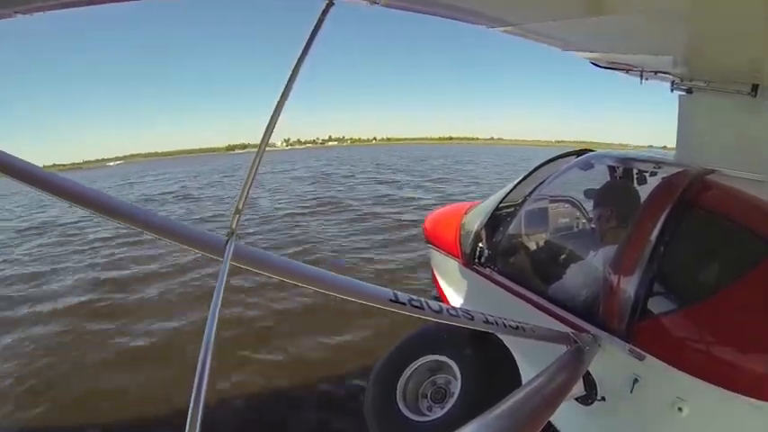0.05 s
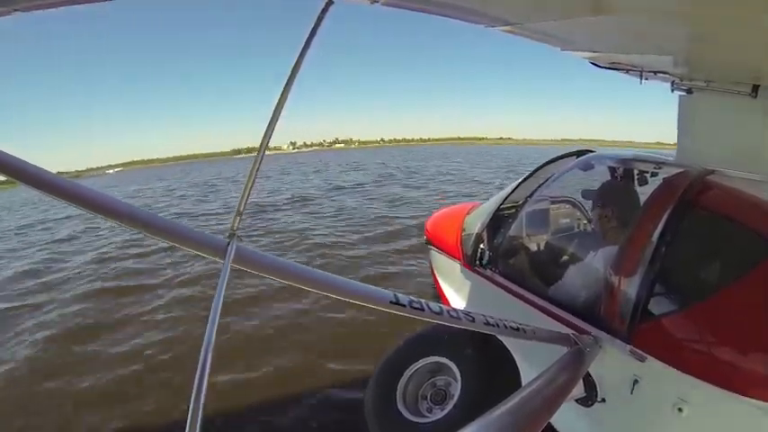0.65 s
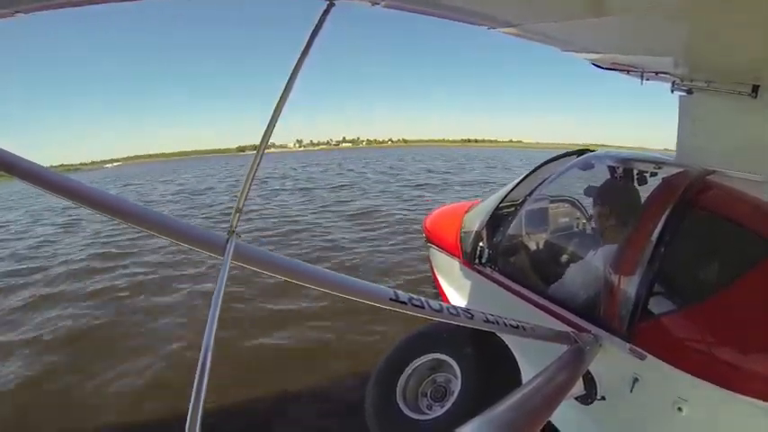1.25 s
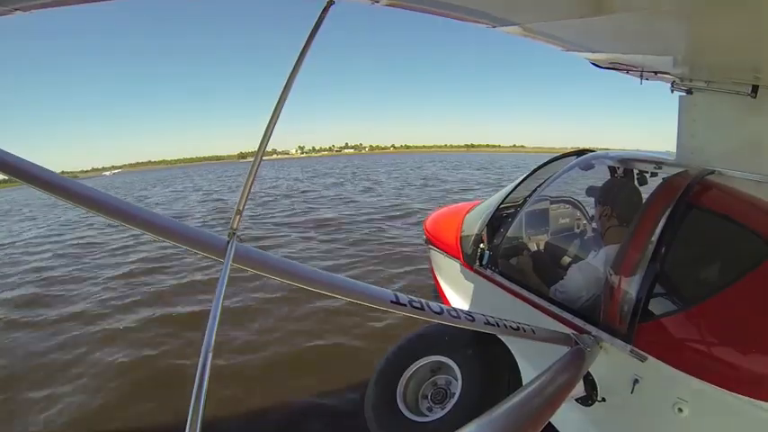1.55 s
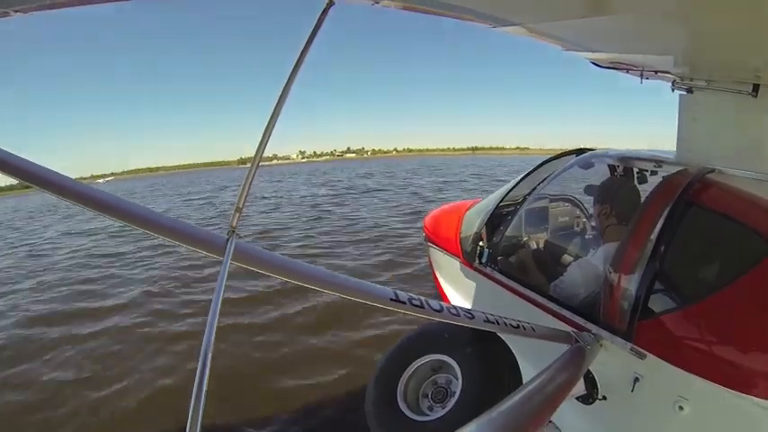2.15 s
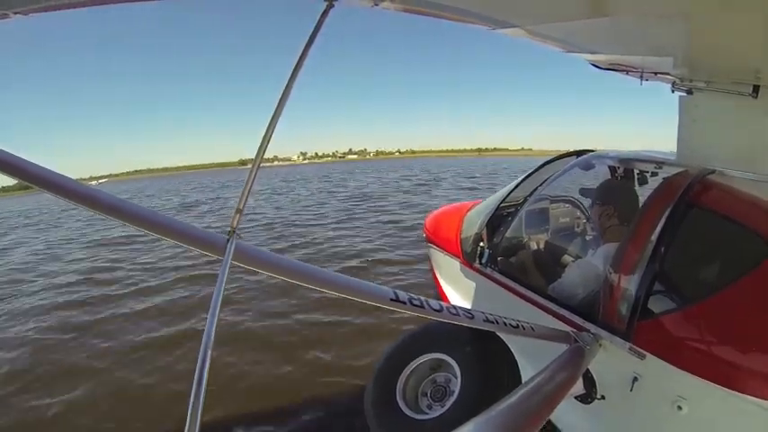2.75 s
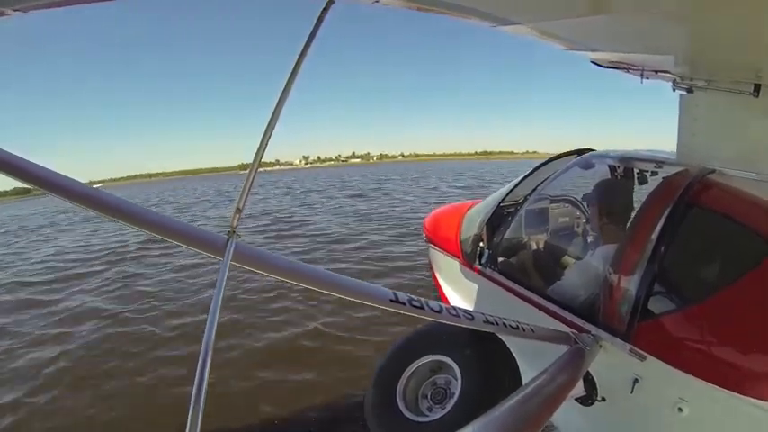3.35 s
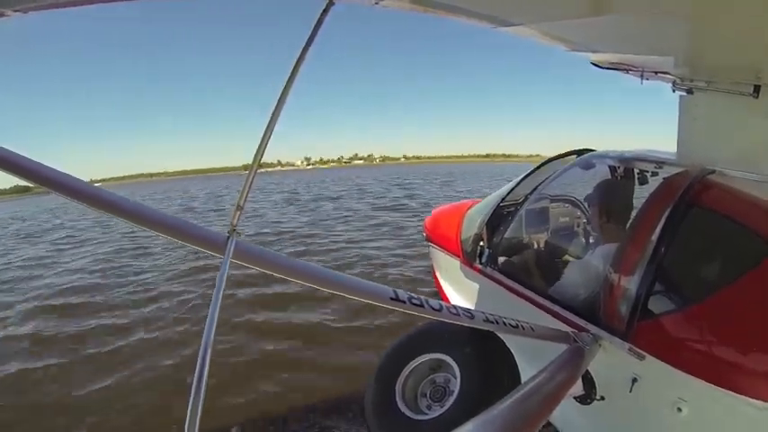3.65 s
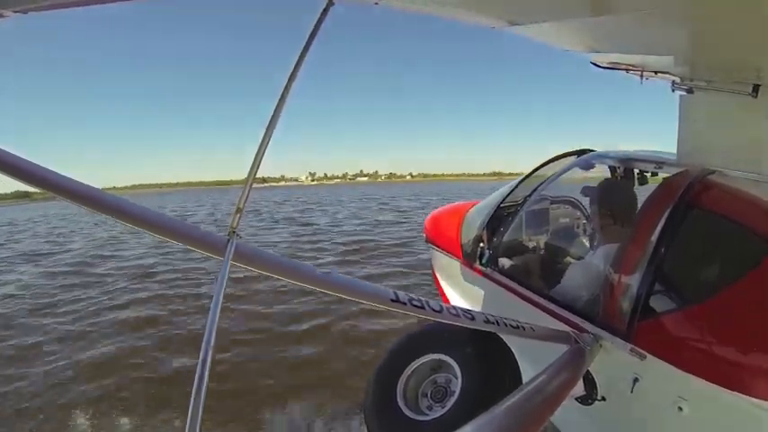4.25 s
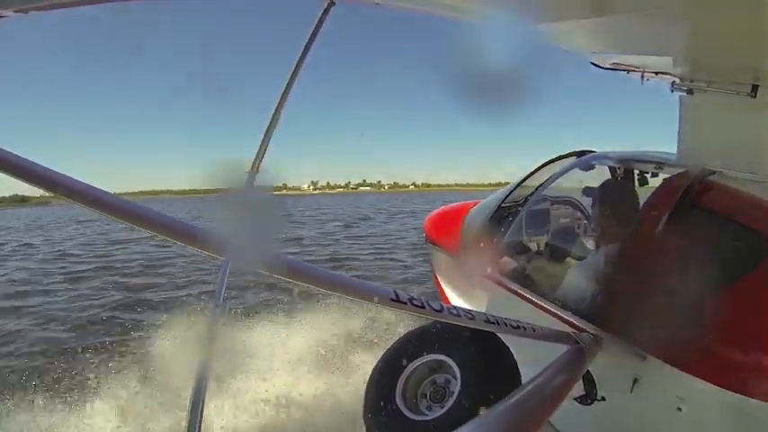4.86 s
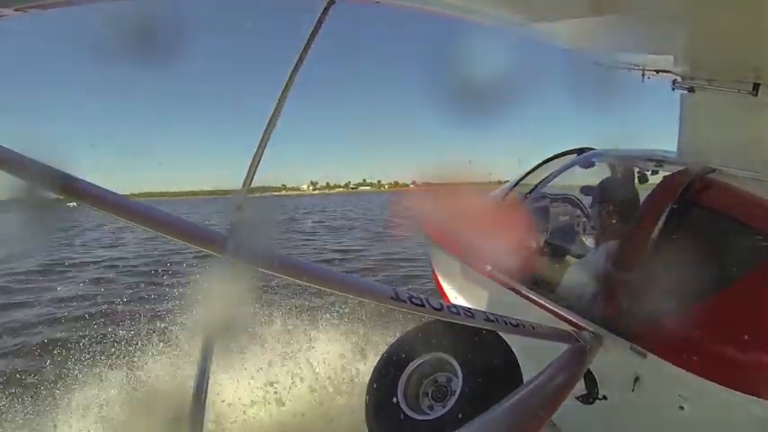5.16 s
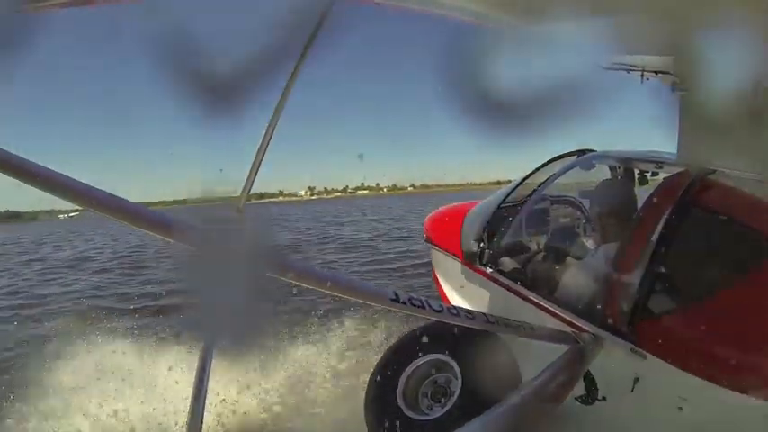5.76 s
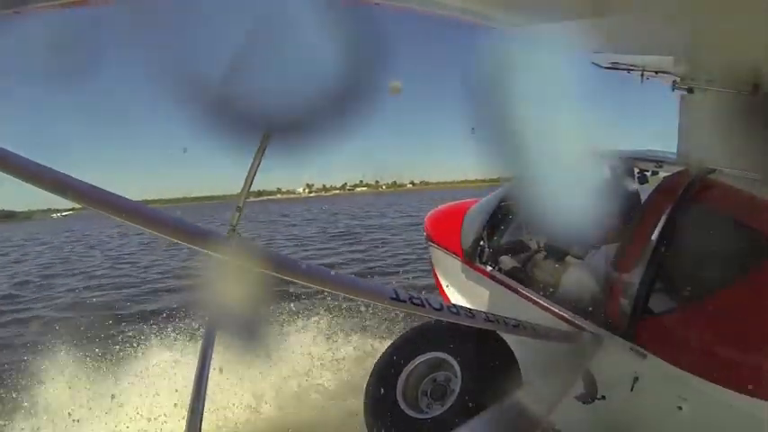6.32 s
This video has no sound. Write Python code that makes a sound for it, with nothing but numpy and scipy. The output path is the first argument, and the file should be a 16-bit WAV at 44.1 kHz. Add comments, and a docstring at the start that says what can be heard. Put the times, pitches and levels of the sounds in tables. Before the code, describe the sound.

Close on the wing of a light plane descending over water, rough wind rumbles and hisses in surges over the low pulse of an idling engine. A few knocks, hollow thumps and small rattles come from the vibrating structure. Then the hull meets the river, and splashes slap the microphone housing, followed by thickening spray, ticking drops and one hard final hit while the engine and wind carry on.

```python
"""A low engine throb and a rush of air are heard first, from a cased camera on the wing of a small
amphibian plane that glides, idling, down to a river. Turbulent surges force the wing and the case
into resonance; gusts thump the panels, and the mount rattles and knocks now and then.
At touchdown slugs of water strike the case and excite its modes, then spray and single drops
patter over it."""
import sys
import numpy as np
from scipy import signal
from scipy.fft import rfft, irfft, next_fast_len
from scipy.io import wavfile
from scipy.ndimage import uniform_filter1d, minimum_filter1d

SR = 44100
rng = np.random.default_rng(int(sys.argv[2]) if len(sys.argv) > 2 else 0)


def to_wav(sig):
    """Store sig (one row per channel, or 1-D mono) as 16-bit WAV at the path in sys.argv[1].

    Samples outside -1..1 are clipped; the rate is SR.
    """
    pcm = np.clip(np.atleast_2d(sig), -1, 1) * 32767
    pcm = np.round(pcm).astype(np.int16)
    wavfile.write(sys.argv[1], SR, pcm.T)  # frames by channels


N = 281799
TIME = np.arange(N) / SR

# Levels are relative within each table.
# rotation rate of the crankshaft: (t/s, f/Hz)
CRANK_RATE = [(0, 34.81), (.9, 33.86), (1.5, 32.13), (2.1, 32.2), (3, 31.17), (4, 30.93), (5, 30.62),
              (6.39, 30.38)]
# engine partials: (multiple of the crankshaft rate, level/dB)
ENGINE_ORDERS = [(1, -17.5), (1.5, -33.5), (2, -28), (2.5, -36.5), (3, -31.5), (3.5, -51), (5, -28.5),
                 (5.5, -33.5), (6.5, -39), (8, -44.5), (18, -60.5), (21, -61.5)]
# sway of the wing, growing through the glide and fading on the water: (t/s, level/dB)
SWAY_LEVEL = [(0, -13.5), (.6, -15.5), (1.2, -13.5), (1.45, -9.5), (2.0, -12.5), (3.7, -9), (4.7, -14),
              (5.5, -15), (5.75, -11.5), (6.39, -15.5)]
# the sway falters as the hull settles: (t/s, duration/s, change/dB)
SETTLING_DIPS = [(4.74, .09, -11), (5.42, 0.1, -9)]
# modes of the wing frame: (f/Hz, bandwidth/Hz, level/dB)
FRAME_MODES = [(44, 20, -13), (66, 6.7, -0.5), (78, 10, -5), (93.2, 14, -2.5)]
# modes of the wing panels: (f/Hz, bandwidth/Hz, level/dB)
PANEL_MODES = [(156.4, 9.6, 1.5), (175.2, 22.8, -1.5), (189.7, 14, -2), (204.2, 8.8, -2),
               (246.1, 11.6, -12.5), (287, 15.7, -18)]
# broadband rumble of the wing: (f/Hz, level/dB)
RUMBLE_SPECTRUM = [(20, -27), (40, 7), (110, -10), (135, 4), (200, -15), (290, -13), (340, -22.5),
                   (700, -68)]
# airflow between surges: (t/s, rush level/dB, hiss level/dB)
STEADY_AIRFLOW = [(0, -38, -56.5), (.6, -41.5, -59.5), (1.8, -39, -55), (2.6, -39, -54), (3.25, -38, -52.5),
                  (4.4, -38, -52), (5.3, -39, -50), (6.39, -35, -50.5)]
# surges of turbulent air: (t/s, duration/s, slipstream rise/dB, buffeting rise/dB)
AIR_SURGES = [(.03, 0.23, 3, 4), (0.238, .27, 7.5, 12), (0.681, 0.31, 7, 6.5), (1.014, 0.048, 5.5, 10),
              (1.2, .23, 4.5, 3.5), (1.533, 0.13, 5.5, 9), (1.94, 0.52, 6.5, 7.5), (2.49, 0.31, 2, 3),
              (2.879, 0.17, 4, 4.5), (3.55, 1.08, 4, 4.5), (4.85, 0.29, 1.5, 4.5), (5.416, 0.35, 3, 1),
              (5.913, .36, 3.5, 6)]
# modes of the case and its mount: (f/Hz, bandwidth/Hz, struck level/dB, air-driven level/dB)
CASE_MODES = [(420, 317, -11, -11), (563, 76, -23, -6.5), (852.6, 65, -2, -2), (935, 53.6, 5, -2),
              (1002.4, 37.6, -3, 1), (1120.5, 29.6, 4, -2.5), (1175, 85, -20, -5), (1315, 56, 2.5, 0.5),
              (1442, 113, 4, -7), (1783, 32, 0.5, -8), (1886, 130, -3.5, -14), (2105, 41, 2, -14),
              (2540, 24, -11, -18.5), (2820, 105, -5, -21), (2920, 66, -6, -34), (3100, 140, -43, -19),
              (3350, 174, -24, -20)]
# hiss of the slipstream: (f/Hz, level/dB)
HISS_SPECTRUM = [(300, 3), (1500, 10), (2400, 15.5), (3400, 6), (4000, 7), (4800, 9), (5500, 2.5),
                 (6450, 5), (7400, -1.5), (8700, 2), (9900, -2.5), (11000, 1), (13000, -7.5), (15000, -34)]
# jolts of a loose fitting: (t/s, level/dB)
FITTING_JOLTS = [(.148, -25), (.306, -30), (.372, -28), (.825, -28.5), (1.126, -30), (2.079, -21.5),
                 (2.299, -29), (2.350, -28.5), (2.4, -28.5), (2.903, -29), (2.960, -26), (3.04, -29.5),
                 (3.096, -31), (3.372, -29), (3.624, -27), (3.889, -21), (4.004, -26.5), (4.135, -25.5),
                 (4.233, -26.5), (4.919, -24)]
# modes of that fitting: (f/Hz, bandwidth/Hz, level/dB)
FITTING_MODES = [(1870, 105, -1), (2055, 63, 3), (2868, 110, -0.5), (3430, 180, -11.5)]
# blows from the mount in flight, then from water: (t/s, level/dB, tilt/(dB per octave), decay time/s)
CASE_BLOWS = [(.4100, -17, -1.5, .002), (0.4926, -11.5, 2.5, 0.003), (0.7072, -23.5, -9, 0.0013),
              (1.066, -33.5, 18, .001), (1.2962, -14.5, -5.5, 0.0046), (4.5541, -7.5, -1.5, 0.003),
              (4.6789, -13, -2.5, 0.0078), (4.7434, -7.5, -0.5, 0.0038), (4.817, -21.5, -1.5, 0.0049),
              (4.848, -9.5, -4, 0.018), (5.058, -7, -2, 0.0022), (5.069, -9, -5.5, 0.0037),
              (5.1743, -17, -7.5, 0.004), (5.559, -23, 1, .003), (5.6742, -18.5, -4, 0.0014),
              (5.8173, -20, -4, 0.005), (6.0538, -21, 1, 0.0014), (6.2020, -14.5, -7, 0.0025),
              (6.2530, 2.5, 0.5, 0.0039), (6.2585, -2.5, -8, 0.008)]
# crack of a blow: (f/Hz, level/dB)
CRACK_SPECTRUM = [(250, -4.5), (400, -4.5), (700, -15), (1300, 8), (2400, -5.5), (3100, 1), (4200, -16),
                  (5200, -22), (7400, -25.5), (8500, -58), (15000, -51)]
# gusts that slap the panels: (t/s, peak level/dB)
GUST_SLAPS = [(.446, -5.5), (.464, -6), (.855, -11), (0.899, -10.5), (1.057, -14.5), (2.064, -14.5),
              (2.98, -10), (4.219, -11), (4.685, -14), (5.655, -16), (6.0, -17)]
# panel modes excited by a gust: (f/Hz, bandwidth/Hz, level/dB)
THUMP_MODES = [(184.4, 29.4, 3), (209, 29.3, -0.5), (285, 23, -16)]
# patter of spray on the case: (f/Hz, level/dB)
PATTER_SPECTRUM = [(250, -16), (700, -1), (1000, 5.5), (1400, 9.5), (2100, 3), (2400, -7.5), (3000, -2.5),
                   (4500, -19), (6500, -39), (8000, -37), (11000, -37), (15000, -68)]
# crackle of the finest droplets: (f/Hz, level/dB)
CRACKLE_SPECTRUM = [(2000, -14), (4400, 10), (5500, -3), (6500, 3), (7600, -9), (11000, -6), (15000, -13)]
# sheets of spray sweeping the case: (t/s, duration/s, rise/dB)
SPRAY_SHEETS = [(5.41, 0.083, 8.5), (5.535, 0.053, 8), (5.64, 0.06, 5), (6.01, .21, 3.5)]
# single drops on the case: (t/s, level/dB, f/Hz)
DROP_IMPACTS = [(4.5257, -32, 6440), (4.527, -34, 4700), (4.7018, -37, 6360), (4.8537, -37, 6500),
                (4.9817, -40, 6500), (5.0181, -38, 6500), (5.3119, -38, 6496), (5.432, -30.5, 4520),
                (5.493, -34.5, 8700), (5.557, -28, 4170), (5.7033, -36, 6500), (6.0323, -37, 6486)]


def undb(db):
    """Amplitude ratio of a level in decibels."""
    return 10 ** (np.asarray(db) / 20)


def unit(x):
    """Normalisation to rms 1."""
    return x / np.sqrt(np.mean(x ** 2))


def curves(table):
    """Linear interpolation of each column in time."""
    s, *columns = np.transpose(table)
    return [np.interp(TIME, s, c) for c in columns]


def swells(rows, attack_s, release_s):
    """Sum of trapezoidal envelopes in dB, from rows of (t/s, duration/s, change/dB)."""
    return sum(db * np.clip((TIME - s) / attack_s, 0, 1)
               * np.clip(1 - (TIME - s - length_s) / release_s, 0, 1) for s, length_s, db in rows)


def noise(n=N):
    """Gaussian white noise."""
    return rng.standard_normal(n)


def walk(rate):
    """Random modulation of rms 1: ramps between values drawn rate times a second."""
    k = max(int(SR / rate), 1)
    return unit(uniform_filter1d(np.repeat(noise(N // k + 1), k), k)[:N])


def grains(rate, spread_db):
    """Shot noise: rate random impacts a second, mostly small and a few large."""
    hit = rng.random(N) < rate / SR
    size = undb(spread_db * np.minimum(rng.exponential(size=N), 4))
    return unit(hit * size * np.sign(noise()))


def ring(x, modes):
    """Modal superposition; neighbouring modes move in antiphase."""
    return sum((-1) ** k * undb(db) * signal.lfilter(*signal.iirpeak(hz, hz / width, SR), x)
               for k, (hz, width, db) in enumerate(modes))


def colour(x, spectrum):
    """Minimum-phase filter through (f/Hz, level/dB) points; folding the cepstrum makes it causal."""
    hz, db = np.transpose(spectrum)
    size = next_fast_len(2 * len(x), True) // 2 * 2
    bins_hz = np.maximum(np.arange(size // 2 + 1) * SR / size, 1)
    magnitude = undb(np.interp(np.log(bins_hz), np.log(hz), db))
    cepstrum = irfft(np.log(magnitude))
    cepstrum[1:size // 2] *= 2
    cepstrum[size // 2 + 1:] = 0
    return irfft(rfft(x, size) * np.exp(rfft(cepstrum)))[:len(x)]


def lowpass(x, hz, order):
    """Maximally flat low-pass filter."""
    return signal.sosfilt(signal.butter(order, hz, fs=SR, output="sos"), x)


def steady(x, span_s):
    """Running normalisation: the rms over span_s stays near 1."""
    return x / np.sqrt(uniform_filter1d(x ** 2, int(span_s * SR)) + 1e-12)


def add_at(out, s, sound):
    """Superposition of a short sound on out, starting at s seconds."""
    start = int(s * SR)
    out[start:start + len(sound)] += sound[:N - start]


def engine(turns):
    """Periodic excitation: a four-stroke cycle spans two turns, giving whole and half orders."""
    flutter = walk(6)  # shared phase modulation, deeper in the higher orders
    out = np.zeros(N)
    for order, db in ENGINE_ORDERS:
        amplitude = np.sqrt(2) * undb(db + 2 * walk(3.954))
        phase = 2 * np.pi * (order * turns + rng.random())
        out += amplitude * np.sin(phase + 0.074 * order * flutter + 0.34 * walk(9))
    return out


def wing(turns, buffet_db, sway_hz=22.25):
    """Forced vibration: air buffets the swaying wing's frame and panels; engine strokes pulse the panels."""
    sway_db = curves(SWAY_LEVEL)[0] + swells(SETTLING_DIPS, attack_s=.07, release_s=.07) - 1.5
    flicker_db = 1.88
    frame_db = -27.5 + 0.81 * buffet_db + flicker_db * walk(13)
    panel_db = -28.5 + buffet_db + flicker_db * walk(16)
    sway = np.sin(2 * np.pi * np.cumsum(sway_hz + 1.176 * walk(3.8)) / SR)
    shudder = ring(noise(), [(30.54, 4.3, 0)])
    sway += 0.28 * unit(ring(shudder, [(31.7, 36, 0)]))
    frame = unit(lowpass(ring(noise(), FRAME_MODES), 154, order=4))
    frame += undb(-7.5) * unit(colour(noise(), RUMBLE_SPECTRUM))
    strokes = 1 + 0.61 * np.cos(2 * np.pi * 2 * turns)
    panels = lowpass(ring(noise() * strokes, PANEL_MODES), 305, order=10)
    return (steady(sway, 0.34) * undb(sway_db) + steady(frame, .1) * undb(frame_db)
            + steady(panels, .08) * undb(panel_db))


def slipstream(turns, surge_db):
    """Broadband excitation: turbulence, throbbing with the engine, rings the case under a hiss."""
    rush_db, hiss_db = curves(STEADY_AIRFLOW)
    eddies = undb(1.2 * walk(45) + .9 * walk(150))
    strokes = 1 + 0.28 * np.cos(2 * np.pi * 2 * turns)
    air = noise() * eddies * strokes + 0.46 * grains(200, spread_db=4.3)
    modes = [(hz, width, db) for hz, width, _, db in CASE_MODES]
    rush = unit(lowpass(ring(air, modes), 4430, order=3))
    ticks = .3 * grains(270, spread_db=4)
    hiss = unit(colour(noise() * eddies + ticks, HISS_SPECTRUM))
    return rush * undb(rush_db + surge_db) + hiss * undb(hiss_db + 0.86 * surge_db)


def rattles(surge_db):
    """Intermittent contact: a loose fitting buzzes at each jolt and chatters faintly, more in a surge."""
    jolts, t = np.zeros(N), TIME[:SR // 12]
    for s, db in FITTING_JOLTS:
        buzz = noise(len(t)) * np.exp(-t / .003)
        buzz[0] += 14  # first strike against the seat
        add_at(jolts, s, undb(db - 19.5) * unit(ring(buzz, FITTING_MODES)))
    chatter = unit(ring(grains(50, spread_db=2.3), FITTING_MODES))
    return lowpass(jolts + undb(-58 + 0.43 * surge_db) * chatter, 3800, order=4)


def knocks():
    """Impact excitation: a sharp push and a short splatter ring the case and thump the panel beneath."""
    out, t = np.zeros(N), TIME[:SR // 5]
    modes = [(hz, width, db) for hz, width, db, _ in CASE_MODES]
    thump = (np.sin(2 * np.pi * 210 * t) + 0.79 * np.sin(2 * np.pi * 300 * t)) * np.exp(-t / 0.032)
    for s, db, tilt_db, decay_s in CASE_BLOWS:
        fade = np.exp(-t / decay_s)
        splatter = noise(len(t)) * fade
        push = 0.88 * splatter / np.linalg.norm(splatter)
        push[0] += 1
        body = lowpass(ring(push, modes), 4000, order=4)
        crunch_fade = 0.35 * np.exp(-t / 0.0087)  # a weaker crunch trails the crack
        crack = colour(noise(len(t)) * (fade + crunch_fade), CRACK_SPECTRUM)
        blow = unit(body) + undb(-5.5) * unit(crack)
        blow = colour(blow, [(750, -tilt_db), (1500, 0), (3000, tilt_db)])
        add_at(out, s, undb(db) * (undb(-22) * unit(blow) + undb(-18) * thump))
    return out


def gusts(push_decay_s=0.0068):
    """Transient response: a sudden gust sets the panels' low modes ringing in a hollow thump."""
    out, t = np.zeros(N), TIME[:SR // 6]
    for s, db in GUST_SLAPS:
        push = noise(len(t)) * np.exp(-t / push_decay_s)
        thump = lowpass(ring(push, THUMP_MODES), 312, order=4)
        add_at(out, s, undb(db) * thump / np.abs(thump).max())
    return out


def spray(touchdown_s=4.39, attack_s=0.32, growth_db_per_s=2.4):
    """Shot noise of droplets: their impacts merge into a patter, and the finest crackle brightly."""
    wet_s = TIME - touchdown_s
    onset = np.clip(wet_s / attack_s, 0, 1)
    spray_db = -41.5 + growth_db_per_s * wet_s + swells(SPRAY_SHEETS, attack_s=0.034, release_s=.04)
    droplets = (grains(1100, spread_db=3.8) + 0.65 * noise()) * undb(2 * walk(50))
    patter = unit(colour(droplets, PATTER_SPECTRUM))
    crackle = unit(colour(grains(170, spread_db=2.9), CRACKLE_SPECTRUM))
    return (patter + undb(-20.5) * crackle) * undb(spray_db) * onset


def drops():
    """Damped oscillation: each drop gives a bright tick and a ring of a few milliseconds."""
    out, t = np.zeros(N), TIME[:SR // 30]
    for s, db, hz in DROP_IMPACTS:
        tick = .5 * lowpass(noise(len(t)) * np.exp(-t / .001), 12000, order=2)
        ping = np.sin(2 * np.pi * hz * t) * np.exp(-t / .0021)
        add_at(out, s, undb(db) * (tick + ping))
    return out


def scene():
    """Superposition at one microphone; the same surges drive wing, slipstream and chatter."""
    crank_hz, = curves(CRANK_RATE)
    turns = np.cumsum(crank_hz) / SR
    ramps = dict(attack_s=0.062, release_s=0.031)
    surge_db = swells([(s, length_s, db) for s, length_s, db, _ in AIR_SURGES], **ramps)
    buffet_db = swells([(s, length_s, db) for s, length_s, _, db in AIR_SURGES], **ramps)
    plane = undb(-2) * engine(turns) + wing(turns, buffet_db) + slipstream(turns, surge_db)
    return (plane + rattles(surge_db) + knocks() + gusts() + spray() + drops())[None]


def record(dry):
    """Peak and band limiting: the camera ducks the loudest peaks and cuts the top of the treble."""
    ceiling, hold_samples, top_hz = .8, SR // 60, 15100
    gain = minimum_filter1d(ceiling / np.maximum(np.abs(dry), ceiling), hold_samples)
    limited = dry * uniform_filter1d(gain, hold_samples)
    return signal.sosfilt(signal.ellip(8, .2, 70, top_hz, fs=SR, output="sos"), limited)


dry = scene()
out = record(dry)
to_wav(out)
```